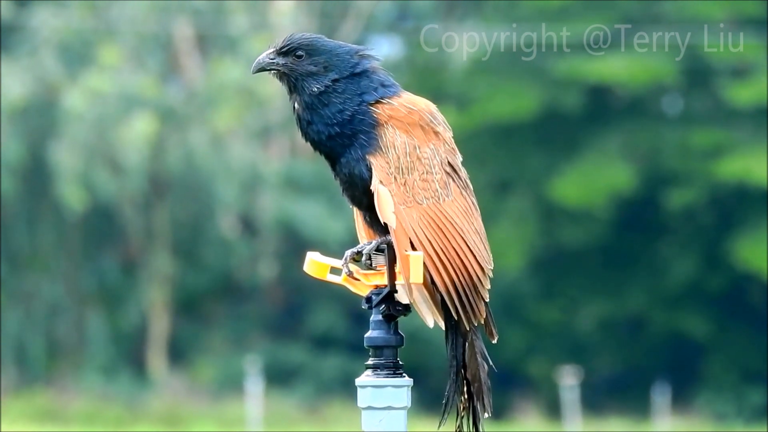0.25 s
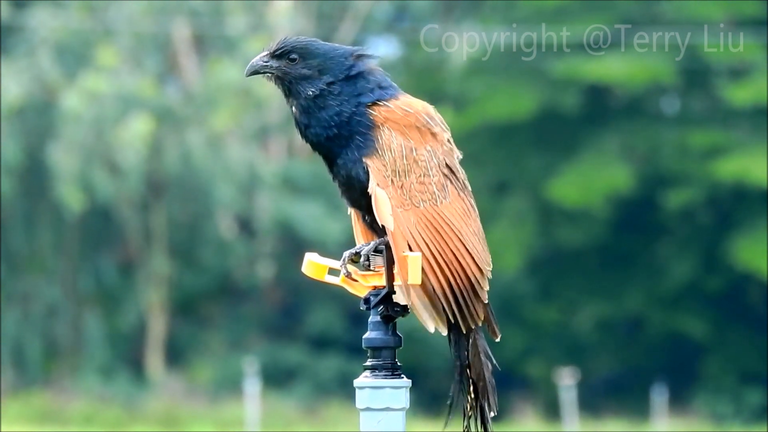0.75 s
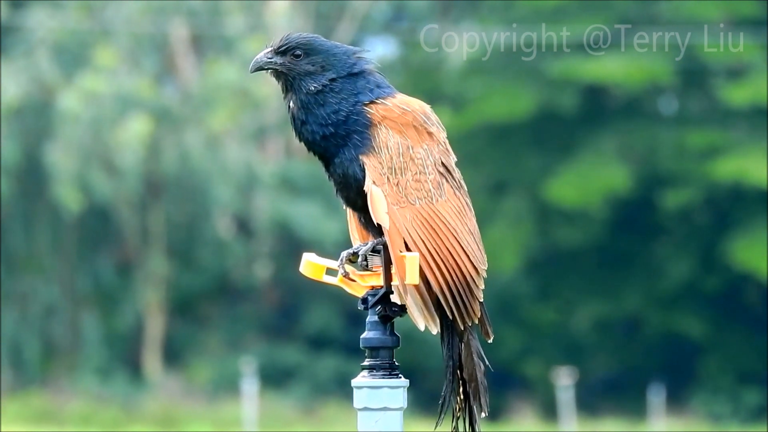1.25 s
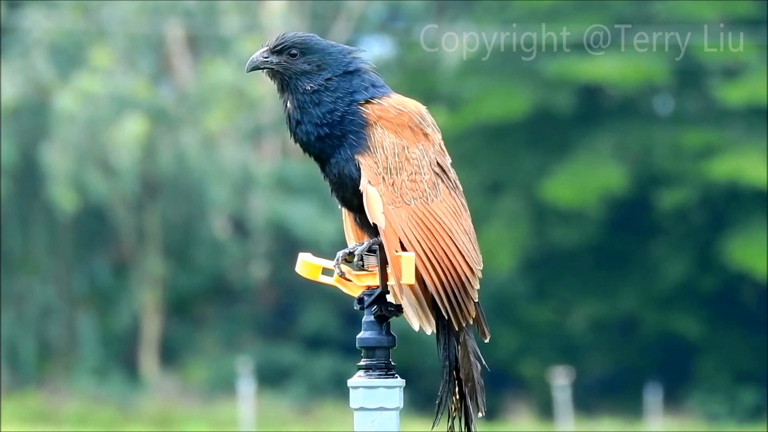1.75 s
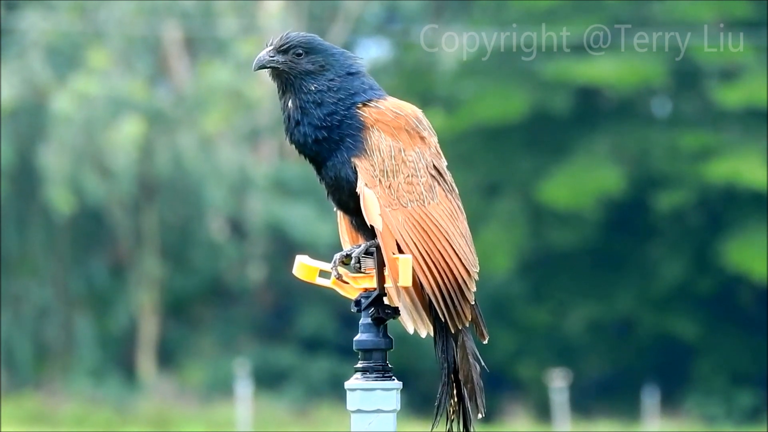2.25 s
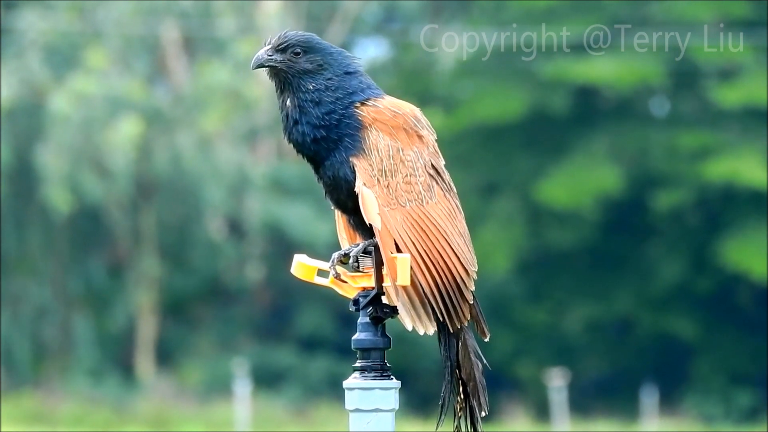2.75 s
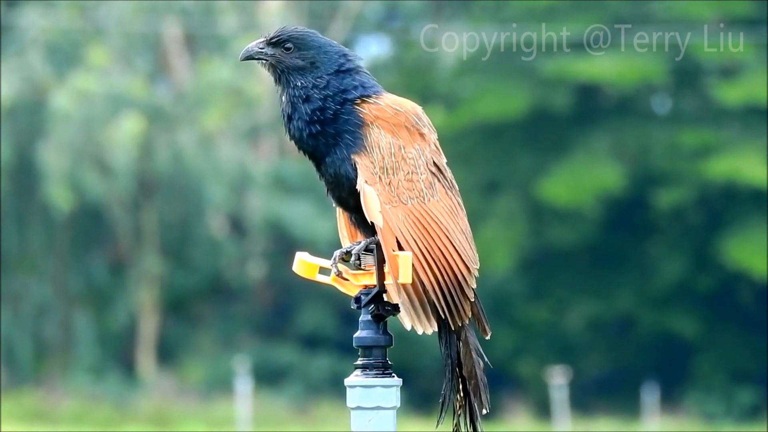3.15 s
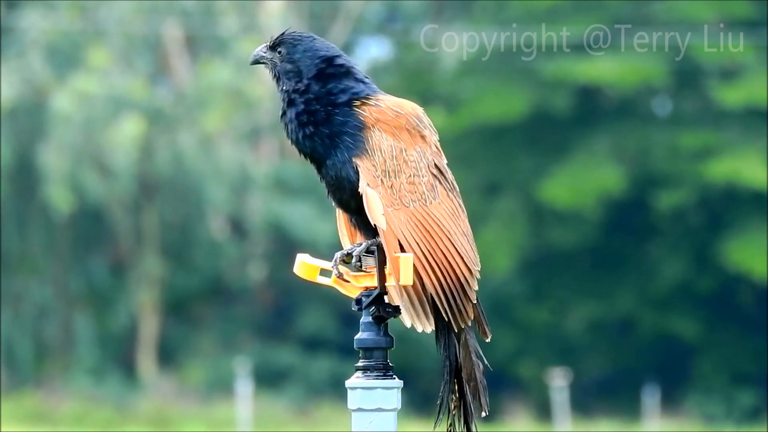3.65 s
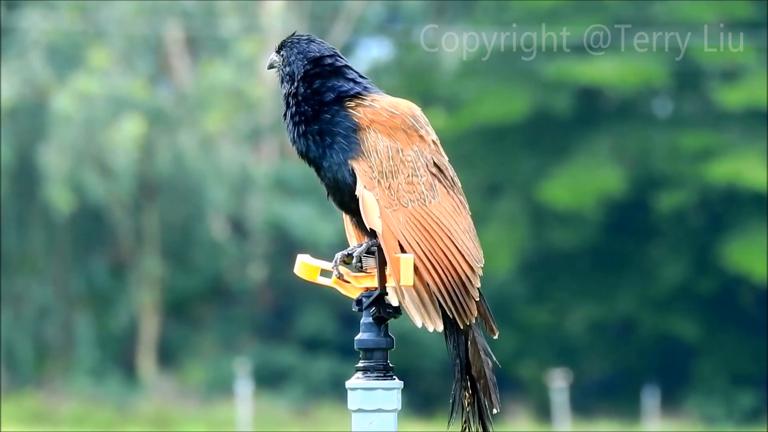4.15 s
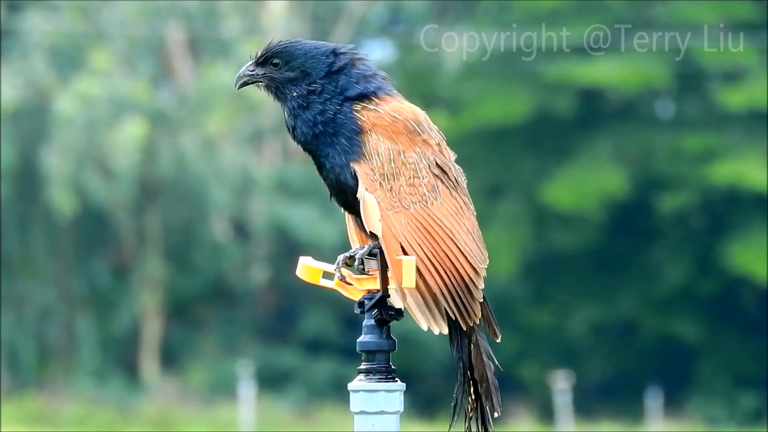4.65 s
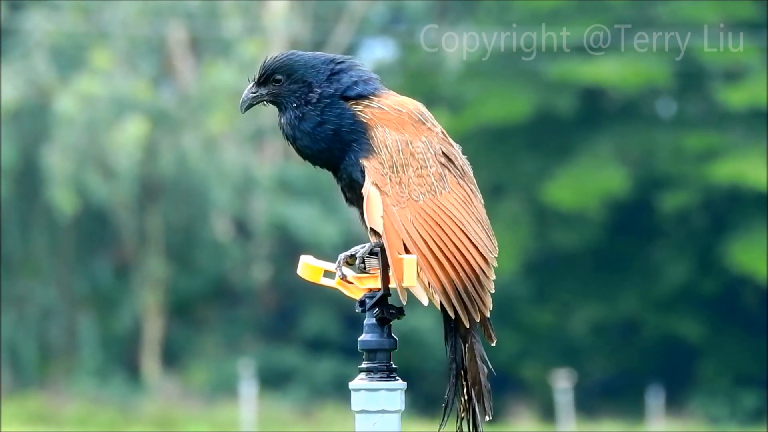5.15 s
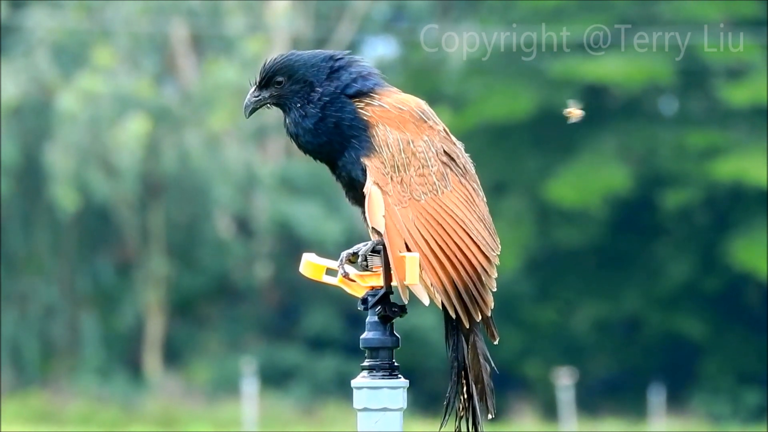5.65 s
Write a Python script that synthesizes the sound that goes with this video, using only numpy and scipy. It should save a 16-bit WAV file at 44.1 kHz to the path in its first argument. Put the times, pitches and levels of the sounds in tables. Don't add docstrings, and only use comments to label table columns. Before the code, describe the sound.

Outdoors, insects chirr steadily and shrilly while a bird gives brief falling hoots in the first second and a large bird hoots once, low, near the end.

```python
import sys
import numpy as np
from scipy import signal
from scipy.io import wavfile
from scipy.ndimage import uniform_filter1d

SR = 44100
rng = np.random.default_rng(int(sys.argv[2]) if len(sys.argv) > 2 else 0)


def inscribe(sig):
    pcm = np.round(np.clip(np.atleast_2d(sig).T, -1, 1) * 32767)
    wavfile.write(sys.argv[1], SR, pcm.astype(np.int16))


def decibels_to_gain(level_db):
    exponent = np.asarray(level_db, float) / 20
    return 10 ** exponent


N = 261072
T = np.arange(N) / SR

# (share of the length [0-1], pitch factor [ratio], level [dB])
LONG_SHAPE = [(0, 1.08, -22), (.12, 1.02, -0.5), (.3, 0.93, -.5), (.45, 0.995, -1.5), (.6, 1.05, -13.5),
              (.74, 1.01, -9), (.88, 0.864, -11.5), (1, 0.9, -14)]
SHORT_SHAPE = [(0, 1.02, -25), (.14, 1.036, -1.5), (.36, 0.981, 1), (.6, 0.984, -0.5), (.8, 0.897, -7),
               (1, 0.94, -16)]
SOFT_SHAPE = [(0, 1.02, -21), (.2, 1.1, -16), (.36, 1.03, -1), (.5, 0.993, -1), (.66, .94, -2),
              (.85, 0.91, -12), (1, 1, -24)]
CUCKOO_SHAPE = [(0, 0.86, -26), (.12, 0.934, -7), (.26, 0.96, 3), (.42, 0.987, 3.5), (.56, 1.013, 2.5),
                (.7, 1.024, 1), (.8, 1.01, -1.5), (.9, 1.003, -13), (1, 0.82, -30)]
# (time [s], length [s], pitch [Hz], peak level [dB], overtone level [dB])
LONG_HOOTS = [
    (0.765, 0.045, 822.3, -17, -44.5),
    (0.853, 0.049, 793, -19, -41),
]
SHORT_HOOTS = [
    (-.022, 0.028, 785.4, -19.5, -31),
    (0.988, 0.033, 759, -25, -36),
]
SOFT_HOOTS = [
    (.097, 0.04, 727, -27.5, -33),
]
CUCKOO_HOOTS = [
    (4.952, 0.062, 445.4, -17.2, -46),
]

SIX_STROKES = [0, .011, .025, .036, .05, .061]
TWO_STROKES = [0, .018]
# (first chirp [s], last chirp [s], chirps [count], level [dB])
FALLING = [(-.043, .253, 3, 0), (1.047, 1.634, 5, 0), (1.808, 3.435, 12, 0), (3.607, 3.758, 2, 0),
           (3.917, 4.36, 4, 0), (4.514, 5.267, 6, 0), (5.44, 5.44, 1, -4)]
STEADY_PAIRS = [(.052, .385, 4, 0), (.52, .733, 3, -2.5), (1.29, 1.483, 3, 0), (1.589, 2.486, 9, 0),
                (3.214, 4.201, 10, 0), (4.805, 5.009, 3, 0), (5.118, 5.776, 7, 0), (5.89, 5.89, 1, -2)]
RIGHT = [(.05, .05, 1, -4), (.172, .47, 3, -1.5), (.626, .892, 3, -3), (1.04, 1.192, 2, -2),
         (1.375, 1.938, 5, -1.5), (2.063, 2.307, 3, -1.5), (2.508, 2.86, 4, -1.5), (3.035, 4.277, 10, -2),
         (4.391, 4.556, 2, -4), (4.69, 4.997, 3, -4), (5.111, 5.812, 6, -1)]
LEFT = [(.023, .023, 1, 2), (.147, .892, 6, -1.5), (1.08, 1.363, 2, -5), (1.523, 1.928, 4, -1.5),
        (2.222, 2.519, 3, -5), (2.718, 3.025, 3, -2.5), (3.161, 3.466, 3, -1.5), (3.723, 3.723, 1, -4),
        (4.095, 4.247, 2, -2.5), (4.412, 4.698, 3, -2.5), (4.864, 4.995, 2, -2.5), (5.505, 5.818, 3, -2.5),
        (5.918, 5.918, 1, -3)]
SWEPT_PAIRS = [(.014, .322, 4, -7.5), (.444, .644, 3, -6), (.766, .965, 3, -7), (1.093, 1.093, 1, -5.5),
               (1.33, 1.964, 7, -4.5), (2.074, 2.4, 4, -5.5), (2.55, 2.66, 2, -13), (2.767, 3.397, 7, -5.5),
               (3.508, 3.725, 3, -4.5), (3.818, 4.03, 3, -6), (4.227, 4.335, 2, -12), (4.417, 5.164, 8, -6),
               (5.275, 5.385, 2, -6), (5.506, 5.61, 2, -8), (5.8, 5.899, 2, -7)]

# (time [s], opening level [dB], fullest level [dB])
PHRASES = [(-.05, -43.5, -39), (1.0, -42.5, -40.5), (2.05, -43, -39.5), (3.0, -45.5, -39), (3.97, -46, -38),
           (4.96, -45.5, -39.5), (5.92, -45.5, -45)]
# (time [s], depth for the near one [dB])
CATCHES = [(.413, 4), (.878, 4), (1.367, 14), (1.46, 14), (1.972, 10), (2.04, 2), (2.247, 10), (3.43, 12),
           (3.53, 1), (4.94, 4), (4.65, 0.5)]
# (time [s], level [dB])
FITFUL = [(0, -58), (.5, -60), (1.4, -70), (1.55, -55), (1.8, -66), (2.0, -71), (2.9, -68), (3.4, -62),
          (3.75, -66), (3.95, -62), (4.15, -73), (4.65, -66), (5.0, -63.5), (5.92, -68)]

# (time [s], length [s], first pitch [Hz], level [dB])
RISES = [(-.03, 0.05, 2960, -50), (0.326, 0.055, 2940, -49), (0.494, 0.058, 2940, -48),
         (0.67, 0.055, 2920, -49), (0.848, 0.056, 2960, -48.5), (1.027, 0.056, 2960, -47.5),
         (5.643, 0.036, 3490, -53), (5.787, 0.05, 3100, -49), (5.235, .022, 3050, -58),
         (5.345, .02, 3050, -58), (5.57, .022, 3050, -57), (5.685, .02, 3150, -57)]
# (first stroke [s], last stroke [s], strokes [count], level [dB])
TRILLS = [
    (.164, .212, 7, -46),
    (.226, .254, 5, -47),
]
# (time [s], length [s], pitch [Hz], level [dB])
PIPING = [(0.766, 0.06, 2760, -53), (1.206, 0.053, 2814, -60), (1.31, 0.088, 2790, -62),
          (1.858, 0.048, 2770, -56), (2.045, 0.021, 2760, -50.5), (2.064, 0.069, 2720, -52),
          (2.131, 0.023, 2700, -56), (2.165, 0.05, 2710, -55.5), (2.36, 0.018, 2770, -52),
          (2.747, 0.036, 2580, -59)]
# (time [s], length [s], first pitch [Hz], last pitch [Hz], level [dB])
CHATTER = [(4.42, .03, 3240, 3400, -58), (4.44, 0.046, 3450, 3620, -58), (4.62, 0.083, 3440, 3330, -68),
           (4.85, .02, 3080, 3330, -59), (5.05, .05, 3620, 3770, -65), (5.11, 0.028, 3640, 3400, -59),
           (5.15, 0.018, 3200, 2950, -62), (5.49, 0.036, 3080, 3100, -58), (.52, .03, 3050, 2950, -55),
           (.69, 0.024, 3000, 2960, -52), (.92, 0.02, 2790, 2730, -56), (.01, 0.022, 3690, 3700, -50)]
TWITTER = [(.142, 0.02, 3780, 3900, -46), (.158, 0.017, 2980, 3600, -50), (.172, 0.045, 3650, 3780, -50),
           (.17, 0.023, 3180, 3300, -50), (.226, 0.019, 3600, 3560, -53), (.22, 0.023, 3200, 3400, -60),
           (2.5, .06, 3150, 3250, -58), (3.62, .03, 3150, 3150, -56), (2.71, .03, 3850, 3850, -56),
           (1.505, 0.013, 3900, 3400, -46), (2.405, 0.027, 3070, 3030, -52),
           (2.455, .03, 3050, 3130, -48.5), (2.99, 0.032, 3280, 3300, -52), (3.0, 0.023, 3080, 3100, -49),
           (3.025, 0.09, 3330, 3100, -52.5), (3.56, .04, 3100, 3250, -56), (3.478, 0.016, 3680, 3480, -51),
           (1.2, 0.031, 3000, 2990, -62), (3.55, 0.013, 3150, 3090, -55), (3.585, 0.033, 3130, 3080, -50),
           (3.24, .06, 2350, 2250, -58)]
SLURS = [(4.41, 0.03, 3830, 3770, -52.5), (4.45, 0.04, 3630, 3490, -56), (4.5, 0.043, 3480, 3220, -56),
         (5.0, 0.069, 3700, 3510, -63), (5.12, 0.048, 3460, 3230, -57), (5.29, 0.038, 3030, 2600, -56),
         (5.465, 0.045, 3300, 3020, -57), (5.49, 0.026, 2920, 2740, -57), (4.33, 0.058, 3250, 3170, -64),
         (4.41, 0.095, 2550, 2950, -61), (4.42, 0.066, 3150, 3300, -61)]
DROOP = [
    (3.977, .098, 4120, 3560, -56.5),
    (3.485, 0.072, 3450, 3440, -48.5),
    (.79, .07, 3750, 3720, -57),
]
PEEPS = [(s, .022, 7380, 7280, -38.5) for s in (5.025, 5.074, 5.262, 5.31, 5.5, 5.557, 5.746, 5.796)]
MURMURS = [(.2, 0.33, 562, 602, -61), (1.14, 0.082, 1236, 1174, -60), (1.5, 0.031, 573, 545.5, -51),
           (1.47, 0.091, 1354, 1166, -54), (1.62, 0.062, 1197, 1220, -55), (1.67, 0.072, 555, 537, -47),
           (2.33, 0.095, 584, 563, -54), (3.02, 0.058, 1216, 1214, -58), (4.0, 0.049, 1222, 1210, -56.5),
           (4.47, 0.06, 1205, 1227, -57), (5.19, 0.087, 469, 703, -51)]

# (time [s], pitch [Hz], level [dB])
HUM = [(0.0, 162, -51), (0.18, 145.9, -61), (0.84, 152.6, -48), (0.92, 148.6, -34.5), (5.82, 151.8, -51.5),
       (5.92, 144, -35.5)]
# (time [s], level [dB])
TRAFFIC = [(0.0, -38.5), (0.28, -40.5), (0.63, -38.5), (4.85, -39), (4.93, -38), (5.92, -40.5)]
# (frequency [Hz], level [dB per Hz])
RUMBLE = [(13, -66), (22, -45), (32, -49), (56, -5.5), (76, 3), (89, -0.5), (118, -5.5), (140, -5.5),
          (195, -1), (320, -22.5), (420, -37.5), (550, -27), (920, -120)]
AIR = [(200, -30), (330, -0.5), (560, 2), (800, -3), (1250, -1), (1600, -7.5), (2500, -11), (3400, -10.5),
       (4000, -7), (5200, 5.5), (6500, -3.5), (8400, -13), (11500, -24), (15500, -32)]
# (frequency [Hz], likeness [0-1])
SAME = [(60, 0.99), (270, 0.98), (450, 0.85), (1220, 0.82), (2000, 0.6), (5500, 0.29), (9000, 1),
        (12000, 0.98)]


def evened(x):
    return x / np.sqrt(np.mean(x ** 2) + 1e-20)


def columns(rows):
    s, *values = np.transpose(rows)
    return [np.interp(T, s, v) for v in values]


def add(mix, s, sound):
    at = round(s * SR)
    sound = sound[:, max(-at, 0):]
    part = mix[:, max(at, 0):][:, :sound.shape[1]]
    part += sound[:, :part.shape[1]]


def panned(x, pan_db):
    return np.array([x * decibels_to_gain(pan_db / 2), x * decibels_to_gain(-pan_db / 2)])


def grove(x, t60, wet_db):
    t = T[:SR // 2]
    echoes = rng.choice([-1., 1.], (2, len(t))) * (rng.random((2, len(t))) < .05)
    echoes *= decibels_to_gain(-60 * t / t60) * np.minimum(t / 0.0022, 1)
    echoes /= np.linalg.norm(echoes[0])
    return x + decibels_to_gain(wet_db) * signal.fftconvolve(x.mean(0)[None], echoes, axes=1)[:, :N]


def hoots():
    out = np.zeros((2, N))
    voices = ((LONG_SHAPE, LONG_HOOTS), (SHORT_SHAPE, SHORT_HOOTS),
              (SOFT_SHAPE, SOFT_HOOTS), (CUCKOO_SHAPE, CUCKOO_HOOTS))
    for shape, rows in voices:
        share, factor, shape_db = np.transpose(shape)
        for s, length, hz, db, over_db in rows:
            u = np.linspace(0, 1, round(length * SR))
            phase = 2 * np.pi * np.cumsum(hz * np.interp(u, share, factor)) / SR
            overtones = 1.6 * np.sin(2 * phase) + np.sin(3 * phase)
            tone = np.sin(phase) + decibels_to_gain(over_db) * overtones
            swell = uniform_filter1d(np.interp(u, share, decibels_to_gain(shape_db)), size=70)
            swell = swell * signal.windows.tukey(len(u), .1)
            add(out, s, panned(np.sqrt(2) * decibels_to_gain(db) * swell * tone, 0))
    return grove(out, t60=0.15, wet_db=-22.5)


def spaced(bouts):
    rows = []
    for first, last, many, db in bouts:
        rows += [(s, db) for s in np.linspace(first, last, round(many))]
    rows = np.array(rows)
    uneven_db = .7
    return rows + [0, uneven_db] * rng.standard_normal(rows.shape)


def cricket(chirps, strokes, first_hz, last_hz, length, bend, db, pans_db, lag):
    out = np.zeros((2, N))
    u = np.linspace(0, 1, round(length * SR))
    swell = np.sin(np.pi * u ** 0.78) ** 2
    pan_db = pans_db[0] + (pans_db[1] - pans_db[0]) * u
    side = decibels_to_gain(np.outer([.5, -.5], pan_db))
    glide_hz = last_hz + (first_hz - last_hz) * (1 - u) ** bend
    chance = rng.standard_normal((len(chirps), len(strokes), 4))
    for (s, chirp_db), row in zip(chirps, chance):
        for stroke, (late, loud, sharp, start) in zip(strokes, row):
            hz = glide_hz * (1 + 0.0079 * sharp)
            phase = 2 * np.pi * np.cumsum(hz) / SR + 9 * start
            tone = np.array([np.sin(phase), np.sin(phase - lag)]) * side
            begin = s + stroke - .4 * length + 0.00048 * late
            add(out, begin, decibels_to_gain(db + chirp_db + 0.5 * loud) * swell * tone)
    return out


def crickets():
    out = cricket(spaced(RIGHT), SIX_STROKES, 5710, 5310, .008,
                  bend=0.98, db=-34.0, pans_db=(-5, -5), lag=-1.37)
    warm_up_s, warm_up_db = 0.0076, -12
    early = [(first - warm_up_s, warm_up_db) for first, *_ in FALLING[1:4] + FALLING[-1:]]
    for chirps, strokes in ((spaced(FALLING), SIX_STROKES), (early, SIX_STROKES[:2])):
        out += cricket(chirps, strokes, 6480, 5680, 0.0055,
                       bend=1.15, db=-35.5, pans_db=(6, 4), lag=-0.12)
        out += cricket(chirps, np.add(strokes, .005), 5724, 5360, 0.007,
                       bend=0.91, db=-34.0, pans_db=(.5, -2), lag=1.0)
    out += cricket(spaced(LEFT), SIX_STROKES, 5704, 4870, .009,
                   bend=1.27, db=-34.5, pans_db=(4, 4), lag=1.0)
    out += cricket(spaced(STEADY_PAIRS), TWO_STROKES, 4580, 4240, 0.013,
                   bend=1.52, db=-39.0, pans_db=(.4, .4), lag=0.29)
    out += cricket(spaced(SWEPT_PAIRS), TWO_STROKES, 5240, 3810, 0.014,
                   bend=1.19, db=-35.0, pans_db=(3, 1.5), lag=0.79)
    high_crowd = rng.random((60, 2)) * [N / SR, -5]
    out += cricket(high_crowd, SIX_STROKES, 5687, 5200, .008,
                   bend=1.25, db=-40.0, pans_db=(.5, .5), lag=.3)
    low_crowd = rng.random((70, 2)) * [N / SR, -6]
    out += cricket(low_crowd, SIX_STROKES[:4], 5136, 4240, .010,
                   bend=1.37, db=-42, pans_db=(-1.5, -1.5), lag=1.23)
    return grove(out, t60=0.22, wet_db=-9)


def resonate(x, hz, width):
    turn = np.exp(2j * np.pi * np.cumsum(hz * np.ones(N)) / SR)
    r = np.exp(-np.pi * width / SR)
    smooth = signal.lfilter([(1 - r) ** 2], [1, -2 * r, r * r], x / turn)
    return 2 * (turn * smooth).real


def buzz(rate, hz, width, rustle, jitter, fade=1.3):
    drift = evened(uniform_filter1d(rng.standard_normal(N), size=3000))
    beat = np.cumsum(rate * (1 + jitter * drift)) / SR % 1
    new_beat = np.diff(beat, prepend=0) < 0
    buckle = new_beat * rng.choice([-1., 1.], N) * rng.uniform(0.74, 1.3, N)
    ribs = rng.standard_normal(N) * np.exp(-fade * beat)
    drive = evened(buckle) + rustle * evened(ribs)
    low_mode = resonate(drive, hz - 0.42 * width, width)
    high_mode = resonate(drive, hz + 0.39 * width, width)
    return evened(low_mode - high_mode)


def cicadas():
    release_s = 0.12
    start, opening_db, full_db = np.transpose(PHRASES)
    corner_s = np.c_[start[:-1], start[1:] - release_s].ravel()
    corner_db = np.c_[opening_db, full_db][:-1].ravel()
    db = np.interp(T, corner_s, corner_db)
    db += np.clip((T - start[-1]) / release_s + 1, 0, 1) * (opening_db[-1] - full_db[-2])
    hz = 7174 - 16 * (db + 42.0)
    catch_db = sum(depth_db * np.exp(-((T - s) / .008) ** 4) for s, depth_db in CATCHES)
    near = decibels_to_gain(-4.0 - catch_db) * buzz(166, hz * 0.9984, 350, rustle=0.97, jitter=0.022)
    far = decibels_to_gain(-2.5 - 12.0 * catch_db) * buzz(179, hz * 1.0174, 570, rustle=2.0, jitter=0.022)
    katydids = decibels_to_gain(-57.5) * buzz(113, 9730, 790, rustle=4.1, jitter=0.012, fade=0.51)
    katydids += decibels_to_gain(columns(FITFUL)[0]) * buzz(58, 3343, 290, rustle=1.2, jitter=.02, fade=1.8)
    out = grove(decibels_to_gain(db) * (panned(near, 1.7) + panned(far, -0.48)), t60=0.028, wet_db=-11)
    return out + grove(panned(katydids, .6), t60=0.032, wet_db=-5.0)


def whistles():
    out = np.zeros((2, N))
    slow = uniform_filter1d(rng.standard_normal((2, N)), size=130)
    flutter, waver = evened(uniform_filter1d(slow, size=130))
    sweeps = [(s, length, hz, hz + 41000 * length, db) for s, length, hz, db in RISES]
    leads = [(s - 0.025, 0.014, 2560, 1.04 * 2560, db - 7) for s, _, hz, db in RISES[1:6]]
    trill = [(s, 0.0099, 3780, 3780 - 416, db) for s, db in spaced(TRILLS)]
    piping = [(s, length, hz, .99 * hz, db) for s, length, hz, db in PIPING]
    # (calls of birds and of the peeping insect, bend of the glide, roughness, pan [dB])
    birds = ((sweeps, 1.8, 1.2, -2.5), (trill, 1.0, 1.4, -1.5), (CHATTER, 1.0, 2.4, 1),
             (leads, 1.0, .9, 1.5), (TWITTER, 1.0, 1.0, -1.5), (SLURS, 1.0, 3.6, 4),
             (DROOP, 3.6, .3, 1.5), (piping, 1.0, 1.3, 7), (PEEPS, 1.0, .15, -1.2),
             (MURMURS, 1.0, 3.2, -.6))
    for rows, bend, rough, pan_db in birds:
        rise_db = 1 if rows is sweeps else 0
        for s, length, first_hz, last_hz, db in rows:
            u = np.linspace(0, 1, round(length * SR))
            first = round(abs(s) * SR)
            at = slice(first, first + len(u))
            hz = first_hz + (last_hz - first_hz) * u ** bend
            hz = hz * (1 + 0.0091 * rough * waver[at])
            level = decibels_to_gain(db + 1.29 * rough * flutter[at] + rise_db * u)
            tone = np.sqrt(2) * level * np.sin(2 * np.pi * np.cumsum(hz) / SR)
            fade = signal.windows.tukey(len(u), 0.28 + 0.17 * min(rough, 1))
            add(out, s, panned(tone * fade, pan_db))
    return grove(out, t60=0.22, wet_db=-5.0)


def snap():
    out = np.zeros((2, N))
    t = T[:2000]
    crack = rng.standard_normal(len(t))
    for size in (5, 5, 4):
        crack = uniform_filter1d(crack, size=size)
    crack = crack * np.exp(-t / 0.0078)
    add(out, 1.511, panned(decibels_to_gain(-41) * np.diff(crack, prepend=0) * 4, 0))
    return grove(out, t60=.2, wet_db=-1)


def read(points, hz):
    f, value = np.transpose(points)
    return np.interp(np.log(hz + 1), np.log(f + 1), value)


def wash(spectrum, size, patchy_db):
    frames = 4 * N // size + 5
    hz = np.fft.rfftfreq(size, 1 / SR)
    a, b, c, d, patches = rng.standard_normal((frames, len(hz), 5)).T
    patches = uniform_filter1d(patches, size=7, axis=0)
    patches = evened(uniform_filter1d(patches, size=9, axis=1))
    same = np.clip(read(SAME, hz), -1, 1)[:, None]
    left = a + 1j * b
    right = same * left + np.sqrt(1 - same ** 2) * (c + 1j * d)
    z = np.array([left, right])
    z *= decibels_to_gain(read(spectrum, hz)[:, None] + patchy_db * patches)
    return evened(signal.istft(z, nperseg=size, noverlap=size * 3 // 4)[1][:, :N])


def traffic():
    hz, db = columns(HUM)
    hum = np.sqrt(2) * decibels_to_gain(db - 6.0) * np.sin(2 * np.pi * np.cumsum(hz) / SR)
    swell = decibels_to_gain(columns(TRAFFIC)[0] + 1.88)
    return swell * wash(RUMBLE, size=4096, patchy_db=1.5) + hum


def open_air():
    return decibels_to_gain(-45.0) * wash(AIR, size=1024, patchy_db=3.0)


def scene():
    return hoots() + crickets() + cicadas() + whistles() + snap() + traffic() + open_air()


def top_cut(x):
    return signal.sosfilt(signal.butter(12, 15840, fs=SR, output="sos"), x)


def record(dry):
    return top_cut(dry)


dry = scene()
out = record(dry)
inscribe(out)
```